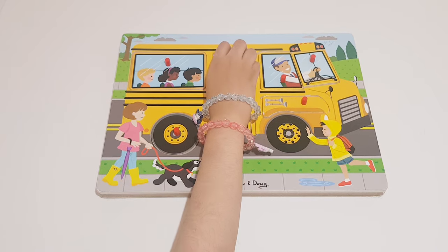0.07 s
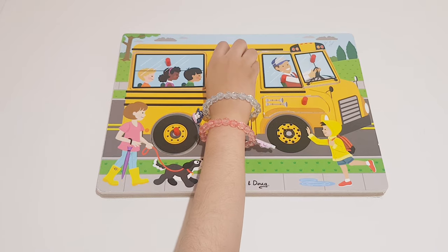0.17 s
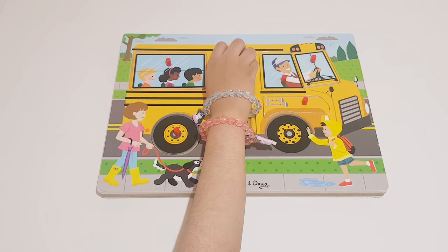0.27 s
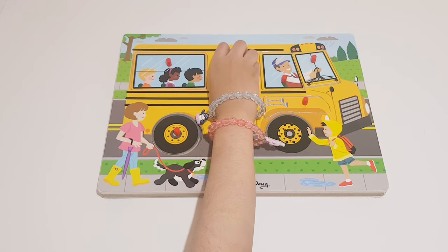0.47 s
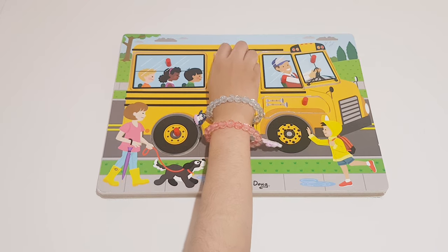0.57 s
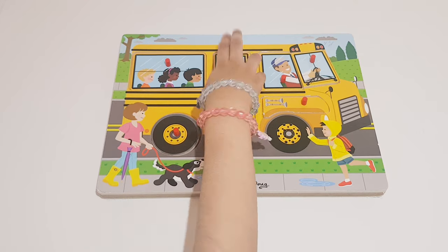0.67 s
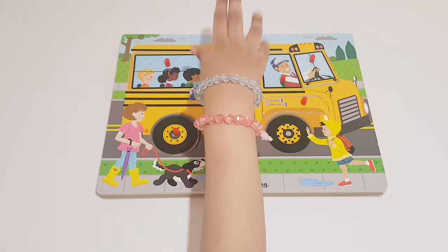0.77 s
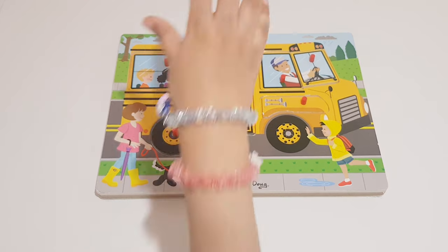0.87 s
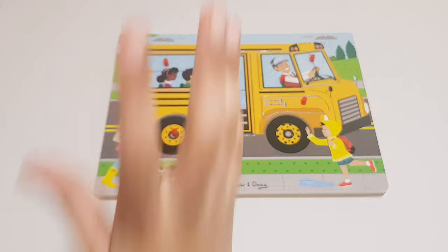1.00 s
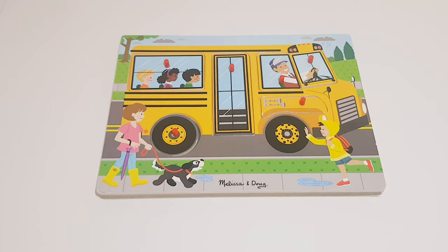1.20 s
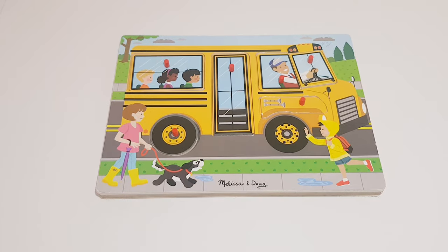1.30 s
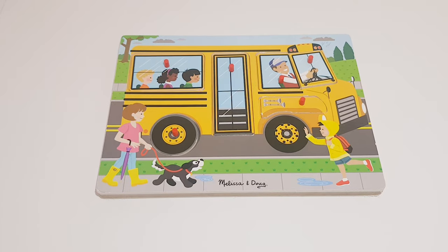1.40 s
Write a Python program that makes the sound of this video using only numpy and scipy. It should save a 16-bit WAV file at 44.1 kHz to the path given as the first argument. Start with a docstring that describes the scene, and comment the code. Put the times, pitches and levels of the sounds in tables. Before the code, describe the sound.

In a quiet room, a close microphone catches a wooden puzzle piece dropping into its recess with one sharp knock. Light wooden ticks and low bumps on the table follow, then bracelet beads click faintly as the hand lifts.

```python
"""Wooden puzzle piece snapping home.

In a small quiet room, fingers rub and nudge a piece until it tips into its recess with a sharp knock.
Each contact cracks and rings the board. The table top thumps softly as the hand lets go,
and bead bracelets click and slide while the arm lifts away. A phone hears it from close by."""
import sys
import numpy as np
from scipy import signal
from scipy.fft import rfft, irfft
from scipy.io import wavfile

SR = 44100
rng = np.random.default_rng(int(sys.argv[2]) if len(sys.argv) > 2 else 0)


def master(y):
    """Save y as 16-bit WAV."""
    cut = np.clip(np.atleast_2d(y).T, -1, 1)
    pcm = np.round(cut * 32767)  # scale
    wavfile.write(sys.argv[1], SR, pcm.astype(np.int16))


N = 63945
TIME_S = np.arange(N) / SR
FREQS_HZ = np.maximum(np.arange(N + 1) * SR / (2 * N), 1)
HIT_SAMPLES = 2048

# Fingers and piece rubbing. Each row: start and length in seconds, level in dB, treble corner in Hz.
RUB_STROKES = [(-.02, 0.051, -60, 1840), (0.003, 0.077, -50.5, 1010), (.075, 0.035, -52, 1519),
               (.212, 0.034, -38, 1500), (0.49, 0.12, -48.5, 2184), (0.567, 0.042, -43.5, 4654),
               (0.596, 0.054, -54, 850), (0.933, 0.075, -66.5, 2946), (1.224, 0.15, -66, 2940)]
# Friction spectrum. Each row: frequency in Hz, relative level in dB.
RUB_SPECTRUM = [(100, -14.5), (350, 2), (550, -2.5), (1100, 0), (2000, 0.5), (3500, -6), (6500, -3),
                (8500, -12.5), (12000, -16.5), (16000, -25)]
# Hand pushing on the table. Each row: start in seconds, level in dB, length in seconds.
HAND_PUSHES = [(0.005, -44, 0.012), (0.224, -34.5, 0.0017), (0.436, -25.5, 0.0032), (0.639, -30.5, 0.0032),
               (1.276, -53.5, 0.0047), (1.435, -28, 0.0049)]
# Table top modes. Each row: frequency in Hz, relative level in dB, T60 in seconds.
TABLE_MODES = [(73.95, -0.5, 0.36), (81.6, -9, 0.1), (117.74, -10.5, .3), (155, -15.5, .15),
               (230.5, -10, 0.16), (273.3, -16, 0.067), (330, -10, 0.23)]
# Wood on wood. Each row: start in seconds, relative level in dB, treble corner in Hz, crack offset in dB.
WOOD_CONTACTS = [(0.0234, -41, 3530, -1), (0.0259, -28.5, 2140, 4), (0.099, -38.5, 1670, -17),
                 (0.1176, -32.5, 1410, 8), (0.2035, -16.5, 920, 14), (0.206, -18, 1370, 3),
                 (0.2159, -10, 870, -11), (0.2428, -12, 2040, 7.5), (0.2463, 1, 3665, -2.5),
                 (0.2482, 1, 6460, 2), (0.2504, -6, 5000, -3), (0.4316, -29.5, 2540, 10.5),
                 (.433, -28.5, 3200, -12), (0.468, -38.5, 4100, 10), (0.479, -31.5, 3450, -3),
                 (.514, -38, 3400, 4.5), (0.5316, -26, 2500, -4.5), (.541, -34, 2500, 9),
                 (.583, -27.5, 1397, 6), (0.5997, -39.5, 4100, 7), (.946, -49.5, 4500, 6),
                 (1.433, -44, 1220, 15.5), (1.44, -38, 1410, 13.5)]
# Piece and board modes. Each row: frequency in Hz, relative level in dB, T60 in seconds.
BOARD_MODES = [(325.7, -31, 0.026), (503, -21, 0.055), (632, -11.5, 0.031), (774, -13, 0.038),
               (1037, -18, 0.075), (1280, -7, 0.033), (1628, -4.5, 0.024), (1678, -4.5, .03),
               (1923, -4, 0.047), (2082, -10, 0.049), (2364, -1, 0.019), (2980, -8, 0.031),
               (3350, -10, 0.033), (4420, -24.5, 0.054), (4530, -14.5, .012), (7076, -11.5, 0.033),
               (10573, -22.5, 0.018)]
# Contact crack spectrum. Each row: frequency in Hz, relative level in dB.
CRACK_SPECTRUM = [(60, -17), (200, -13.5), (500, -1.5), (1100, -4.5), (1800, 1), (3800, 5.5), (5200, -3),
                  (7000, -8), (8300, -15.5), (11000, -17.5), (16000, -25)]
# Beads, nails and edges. Each row: start in seconds, relative level in dB, treble corner in Hz.
HARD_CONTACTS = [(.025, -20, 13000), (.204, -14.5, 11400), (0.2403, -14.5, 12390), (0.2444, -0.5, 13600),
                 (0.245, -15, 15100), (0.2529, -2.5, 14200), (.511, -30, 12400), (0.637, -11, 7100),
                 (1.211, -27.5, 6830), (1.229, -18.5, 14000), (1.2355, -16.5, 15000), (1.239, -22, 12000),
                 (1.438, -9.5, 5500)]
# Click and bead spectrum. Each row: frequency in Hz, relative level in dB.
CLICK_SPECTRUM = [(500, -26.5), (2300, -17), (3600, -0.5), (5000, 0.5), (6600, 2.5), (8300, -14),
                  (11200, 6), (13000, 1), (16000, -3.5)]
# Bracelets sliding. Each row: start and length in seconds, level in dB.
BRACELET_SLIDES = [(0.547, 0.062, -54.5), (0.641, .09, -67), (1.154, 0.052, -67.5), (1.247, 0.055, -52.5),
                   (1.275, 0.091, -63)]
# Room tail bands. Each row: frequency in Hz, T60 in seconds, level in dB.
TAIL_BANDS = [(150, 0.63, -5.5), (445, 0.44, -4), (1010, 0.38, -10.5), (2000, 0.33, -11), (4500, .3, -11),
              (8903, .28, -12.5), (15000, 0.16, -14.5)]
# Room standing waves. Each row: frequency in Hz, peak gain in dB.
STANDING_WAVES = [(324, 7.5), (394, 9.5), (495, -3), (533, -0.5), (578, -2), (640, -4.5), (754, -3),
                  (801, -4.5), (1700, -8)]
# Air and hiss spectrum. Each row: frequency in Hz, relative level in dB.
FLOOR_SPECTRUM = [(15, -41), (25, -21.5), (70, -1.5), (111, 3), (270, -17.5), (373, -10), (641, -22.5),
                  (1940, -24.5), (3820, -30.5), (6380, -22), (7710, -45), (12500, -26), (16000, -35.5)]
# Microphone port balance. Each row: frequency in Hz, left over right in dB.
PORT_BALANCE = [(100, 3.5), (280, 1.5), (600, 3.5), (1300, 4), (2500, 0.5), (5000, 2.5), (9000, 9.5),
                (15000, 4.5)]


def undb(db):
    """Decibels to gain."""
    return 10 ** (np.asarray(db) / 20)


def fade(t60_s):
    """Exponential decay from time zero."""
    return np.exp(-np.log(1000) * TIME_S / t60_s)


def unit(x):
    """Scale to rms 1."""
    return x / np.sqrt(np.mean(x ** 2))


def shape(x, gain):
    """Apply a frequency response."""
    return irfft(rfft(x, 2 * N) * gain)[..., :N]


def curve(hz, values):
    """Interpolate over log frequency."""
    return np.interp(np.log(FREQS_HZ), np.log(hz), values)


def colour(points):
    """Causal response through (Hz, dB) points, unit power gain."""
    hz, db = np.array(points).T
    cepstrum = irfft(np.log(unit(undb(curve(hz, db)))))
    return np.exp(rfft(np.r_[cepstrum[0], 2 * cepstrum[1:N]], 2 * N))


def soften(x, corner_hz):
    """Two-pole low-pass: softer contact, less treble."""
    return signal.lfilter(*signal.butter(2, corner_hz, fs=SR), x)


def at(x, start_s):
    """Place a sound at its start time."""
    out, first = np.zeros(N), max(int(start_s * SR), 0)
    part = x[:N - first]
    out[first:first + len(part)] = part
    return out


def sine(hz):
    """Steady sine, peak 1."""
    return np.sin(2 * np.pi * hz * TIME_S)


def ring(modes):
    """Decaying modes of a struck object; neighbours alternate in sign."""
    return sum((-1) ** k * undb(db) * fade(t60_s) * sine(hz) for k, (hz, db, t60_s) in enumerate(modes))


def burst(t60_s):
    """Decaying noise of unit energy, spectrum evened out to avoid pitch."""
    envelope = fade(t60_s)[:HIT_SAMPLES]
    spectrum = rfft(rng.standard_normal(HIT_SAMPLES) * envelope, 2 * HIT_SAMPLES)
    evened = irfft(spectrum / np.sqrt(np.abs(spectrum)))[:HIT_SAMPLES]
    return unit(evened * envelope ** .25) / np.sqrt(HIT_SAMPLES)


def swell(start_s, length_s):
    """Half-sine rise and fall."""
    return np.sin(np.pi * np.clip((TIME_S - start_s) / length_s, 0, 1))


def grains(rate_per_s=2600, spread_db=3):
    """Dense stick-slip catches of uneven size."""
    catches = (rng.random(N) < rate_per_s / SR) * rng.standard_normal(N)
    return unit(catches * undb(spread_db * rng.standard_normal(N)))


def finger_rubs():
    """Stick-slip friction of fingers and wood."""
    friction = shape(grains(), colour(RUB_SPECTRUM))
    return sum(undb(db) * swell(start_s, length_s) * unit(soften(friction, hz))
               for start_s, length_s, db, hz in RUB_STROKES)


def table_thumps(build_s=0.0073):
    """Soft pushes set the table top booming."""
    force = sum(undb(db) * swell(start_s, length_s) / swell(0, length_s).sum()
                for start_s, db, length_s in HAND_PUSHES)
    boom = ring(TABLE_MODES) * (1 - np.exp(-TIME_S / build_s))
    return signal.fftconvolve(force, boom)[:N]


def wood_knocks(board_db=-7, crack_db=11.5):
    """Each contact cracks and rings the board; softer ones are duller."""
    tap = signal.unit_impulse(HIT_SAMPLES)
    force = sum(at(undb(db) * soften(tap, hz), start_s) for start_s, db, hz, _ in WOOD_CONTACTS)
    ringing = signal.fftconvolve(force, ring(BOARD_MODES))[:N]
    cracks = sum(at(undb(db + offset_db) * soften(burst(t60_s=0.012), hz), start_s)
                 for start_s, db, hz, offset_db in WOOD_CONTACTS)
    return undb(board_db) * ringing + undb(crack_db) * shape(cracks, colour(CRACK_SPECTRUM))


def hard_clicks(gain_db=-0.5):
    """Beads, nails and edges strike, too light to ring the board."""
    ticks = sum(at(undb(gain_db + db) * soften(burst(t60_s=0.026), hz), start_s)
                for start_s, db, hz in HARD_CONTACTS)
    return shape(ticks, colour(CLICK_SPECTRUM))


def piece_squeak(level_db=-53.5):
    """The piece squeaks faintly under pressure."""
    return undb(level_db) * swell(start_s=0.092, length_s=0.3) * sine(hz=493)


def bracelet_slides():
    """Beads catch and slip along the wrist."""
    envelope = sum(undb(db) * swell(start_s, length_s) for start_s, length_s, db in BRACELET_SLIDES)
    return shape(grains() * envelope, colour(CLICK_SPECTRUM))


def room_response(delay_s=0.007, early_db=-11.5, treble_coherence=0.15, coherent_below_hz=350):
    """Early reflections, standing waves and a tail that dies faster in the treble."""
    coherence = treble_coherence + (1 - treble_coherence) / (1 + (FREQS_HZ / coherent_below_hz) ** 2)
    mid = shape(rng.standard_normal(N), np.sqrt((1 + coherence) / 2))
    side = shape(rng.standard_normal(N), np.sqrt((1 - coherence) / 2))
    diffuse = np.array([mid + side, mid - side])
    reflections = undb(early_db) * np.array([at(burst(t60_s=0.067), 0) for _ in range(2)])
    hz, t60_s, db = np.array(TAIL_BANDS).T
    for k, weights in enumerate(np.eye(len(hz))):
        band = shape(diffuse, curve(hz, weights))
        reflections += undb(db[k]) * band * unit(fade(t60_s[k])) / np.sqrt(N)
    decay = fade(t60_s=0.23)
    standing = 2 * decay / decay.sum() * sum(undb(peak_db) * sine(f) for f, peak_db in STANDING_WAVES)
    return np.array([at(port + standing, delay_s) for port in reflections])


def noise_floor(noise_db=-61.5, hum_hz=91.84, hum_db=-67, coherent_below_hz=600):
    """Room air and microphone hiss over a low hum."""
    air = shape(rng.standard_normal((3, N)), colour(FLOOR_SPECTRUM))
    coherence = 1 / (1 + (FREQS_HZ / coherent_below_hz) ** 2)
    stereo = shape(air[2], np.sqrt(coherence)) + shape(air[:2], np.sqrt(1 - coherence))
    return undb(noise_db) * unit(stereo) + undb(hum_db) * sine(hum_hz)


def scene(port_lag_s=0.00013):
    """The board lies slightly left: the left port hears it first and louder."""
    near = wood_knocks() + hard_clicks() + bracelet_slides() + finger_rubs() + piece_squeak()
    lagged = shape(near, np.exp(-2j * np.pi * FREQS_HZ * port_lag_s))
    direct = np.array([near, lagged])
    reverb = signal.fftconvolve(near[None], room_response(), axes=1)[:, :N]
    balance_db = curve(*np.array(PORT_BALANCE).T)
    port_gains = undb(np.array([balance_db, -balance_db]) / 2)
    return shape(direct + reverb, port_gains) + table_thumps() + noise_floor()


def record(dry):
    """The phone cuts rumble, clips at full scale and cuts the top."""
    rumble_hz, top_hz = 10, 15900
    highpass = signal.butter(2, rumble_hz, "high", fs=SR, output="sos")
    lowpass = signal.ellip(8, .2, 70, top_hz, fs=SR, output="sos")
    clipped = np.clip(signal.sosfilt(highpass, dry), -1, 1)
    return signal.sosfilt(lowpass, clipped)


dry = scene()
out = record(dry)
master(out)
```